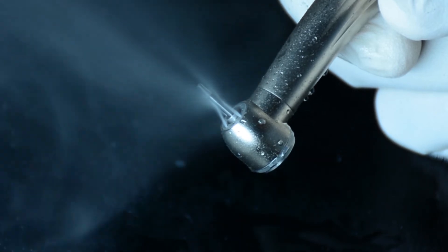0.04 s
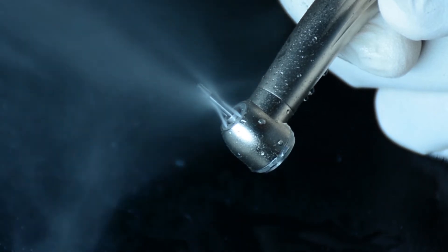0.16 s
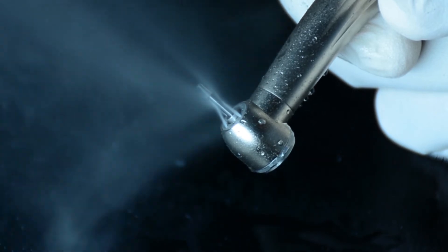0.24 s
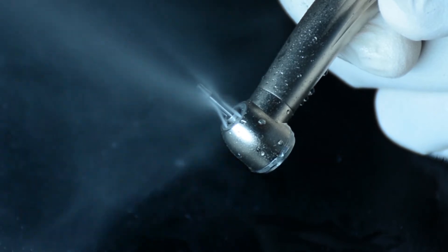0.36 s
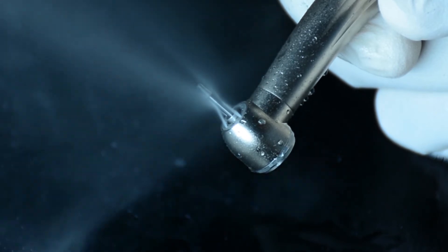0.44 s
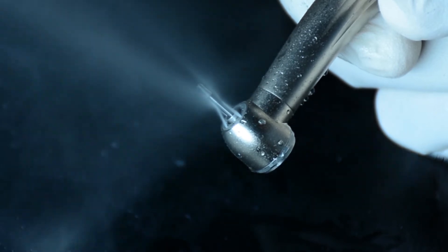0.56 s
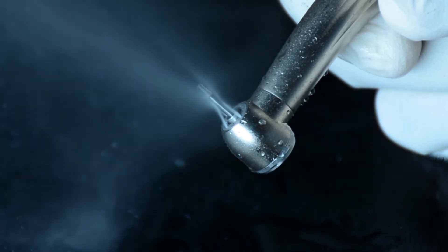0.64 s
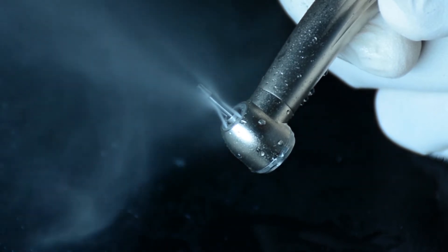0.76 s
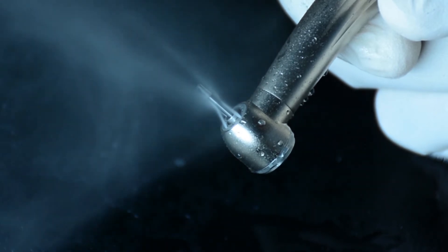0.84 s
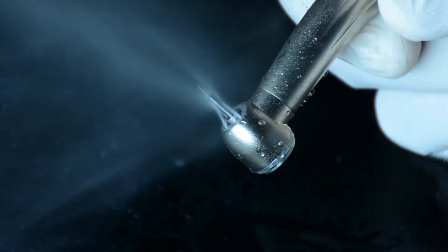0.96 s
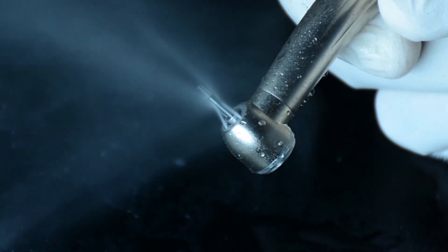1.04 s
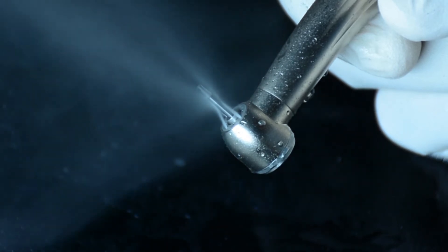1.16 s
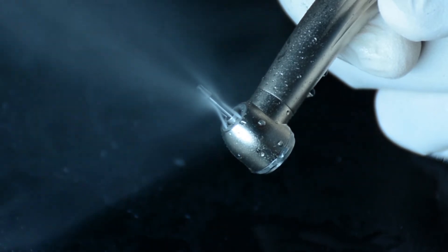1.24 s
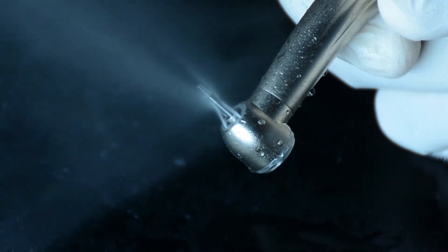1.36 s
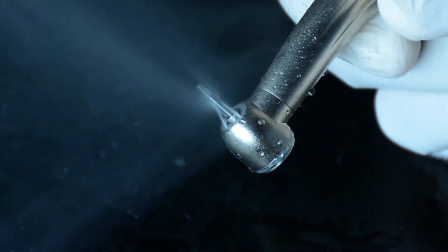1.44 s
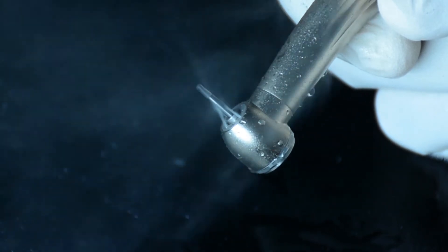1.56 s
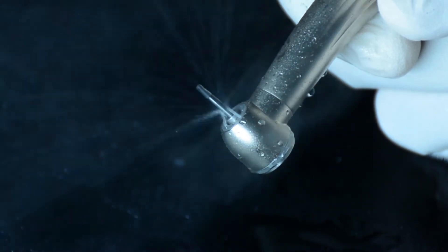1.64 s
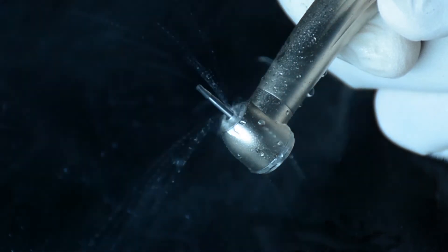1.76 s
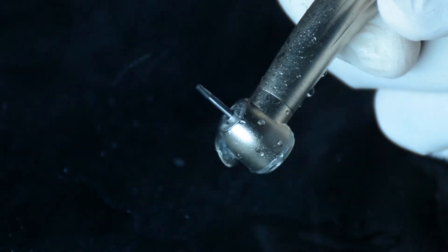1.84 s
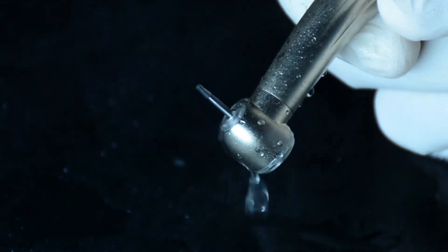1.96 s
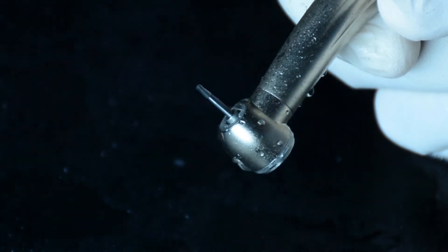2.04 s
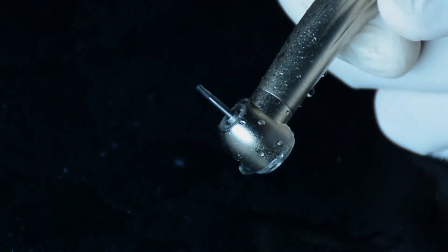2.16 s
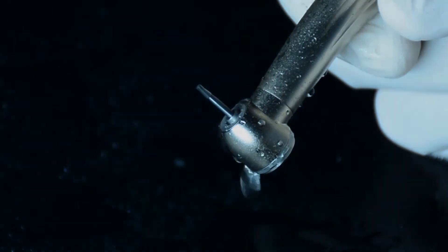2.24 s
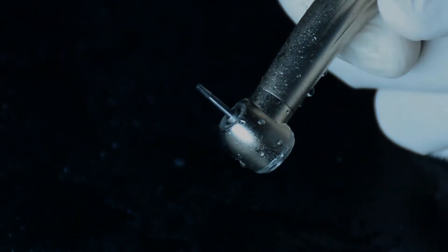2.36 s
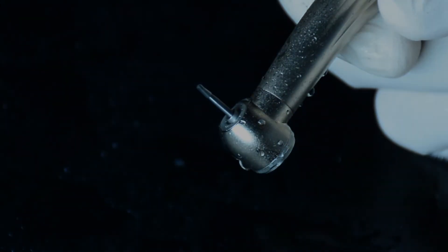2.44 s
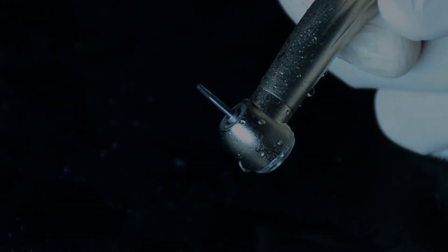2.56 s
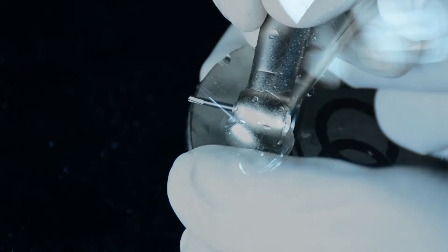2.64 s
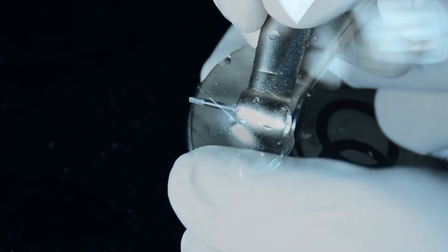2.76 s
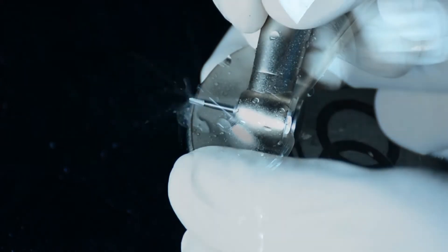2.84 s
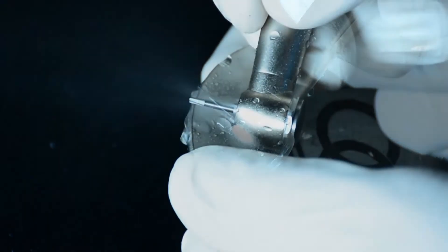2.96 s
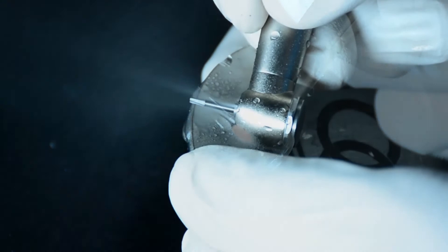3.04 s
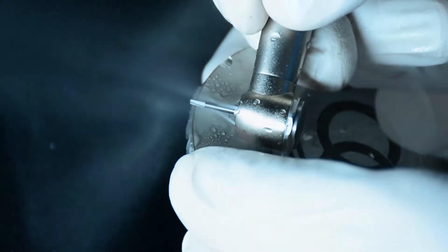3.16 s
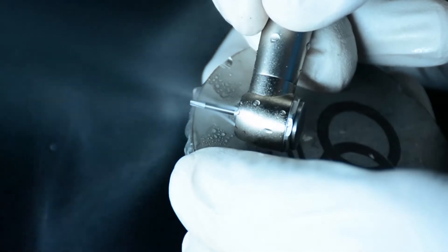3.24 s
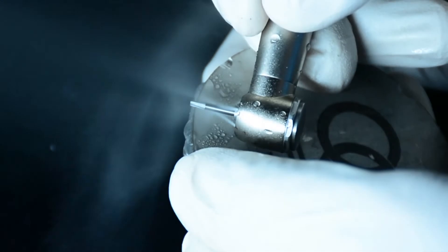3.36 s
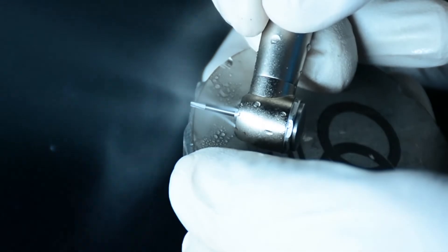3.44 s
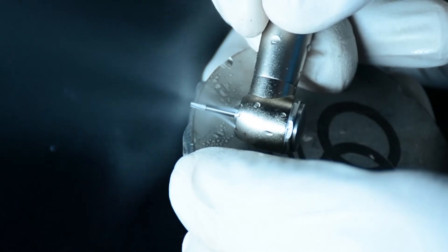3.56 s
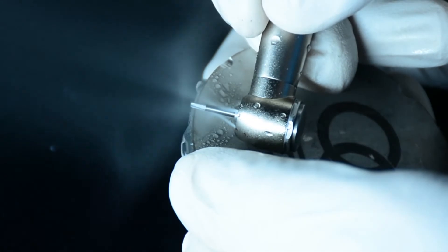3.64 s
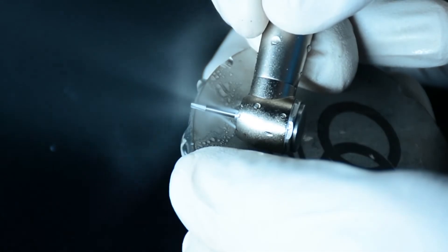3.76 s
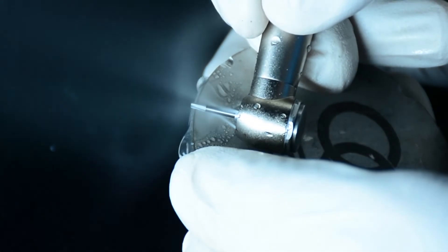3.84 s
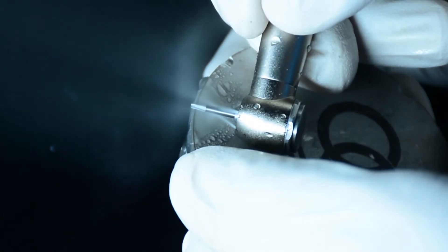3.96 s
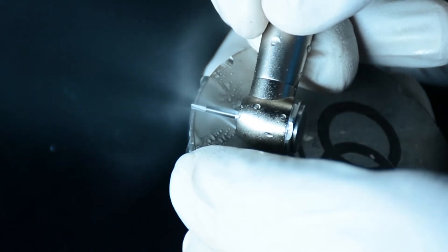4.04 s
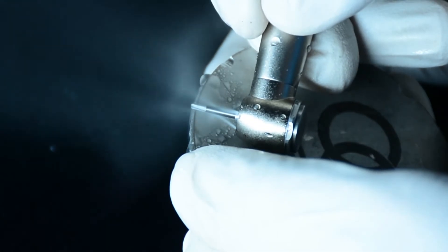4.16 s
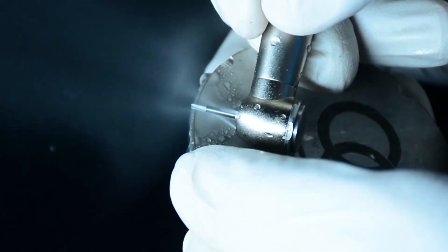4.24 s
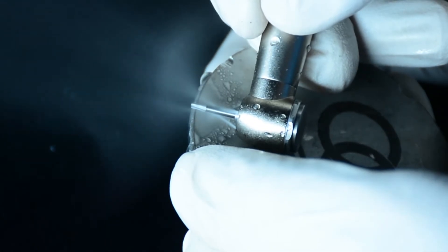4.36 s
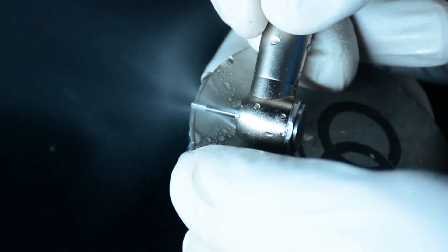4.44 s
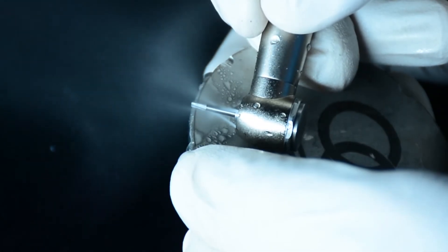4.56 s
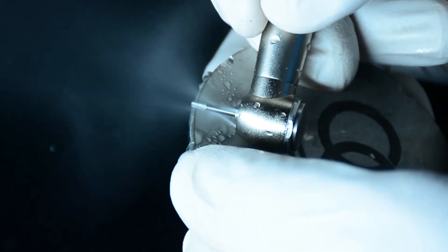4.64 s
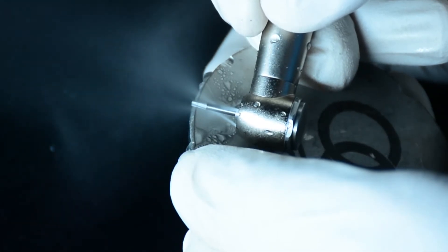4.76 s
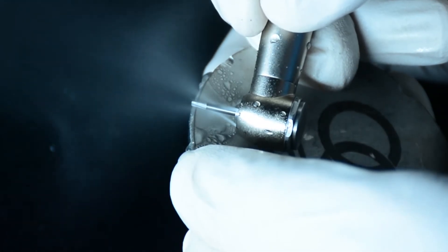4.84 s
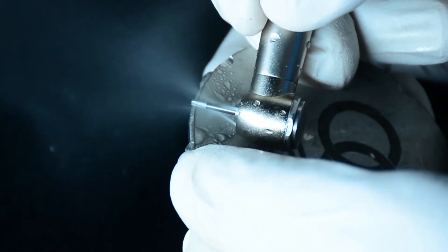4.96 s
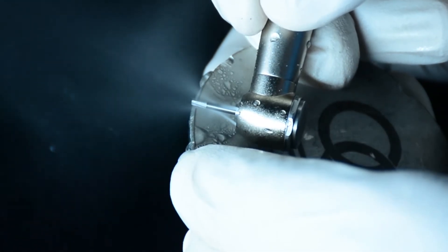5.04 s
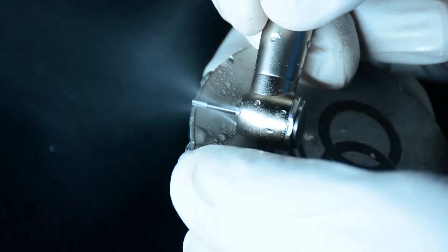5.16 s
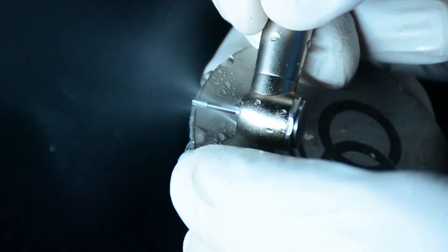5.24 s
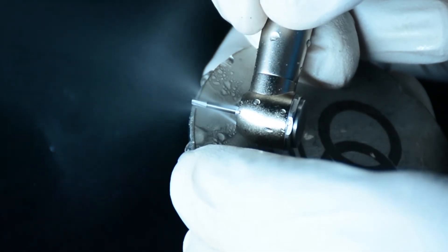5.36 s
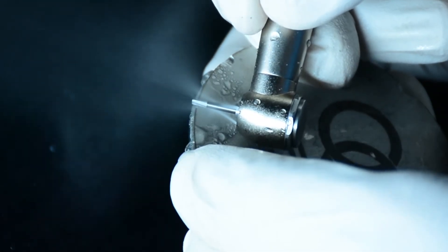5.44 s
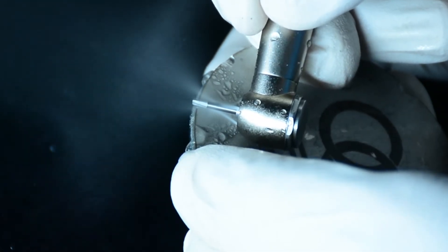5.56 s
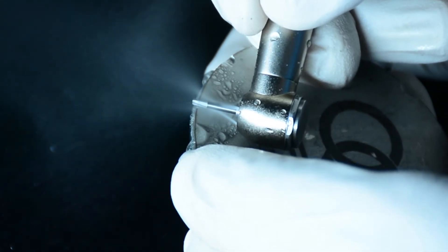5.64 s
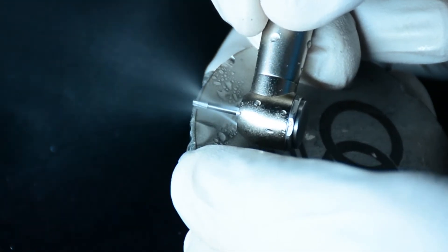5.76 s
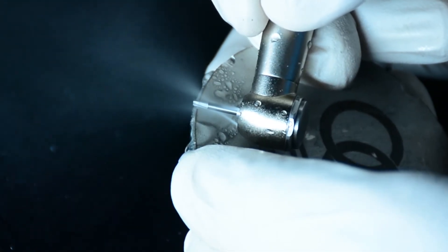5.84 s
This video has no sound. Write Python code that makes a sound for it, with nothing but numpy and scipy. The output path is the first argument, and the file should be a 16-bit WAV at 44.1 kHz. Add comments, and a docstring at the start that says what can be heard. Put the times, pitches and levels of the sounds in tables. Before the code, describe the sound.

Close stereo pickup in a small hard room: a dental drill runs with thin high whine under bright water spray hiss. The air cuts off with small whistles and the rotor glides down in pitch to quiet. After a short lull it shoots up again, spray returns, and the bur grinds a hard piece, ringing and sagging in pitch.

```python
"""A dental air turbine whines at close range under its water spray; the pedal is let go and the rotor coasts down.
After a lull a turbine spins up and its bur bites into a hard piece, which drags the speed down and rings.
Rotor orders are sines on one shaft angle; exhaust, spray, cutting and a low room hum are coloured noise.
Air lines add brief whistles made of tone and breath; a small hard room answers the rotor and whistles."""
import sys
import numpy as np
from scipy import signal
from scipy.fft import rfft, irfft, next_fast_len
from scipy.io import wavfile
from scipy.ndimage import uniform_filter1d, map_coordinates

SR = 44100
rng = np.random.default_rng(int(sys.argv[2]) if len(sys.argv) > 2 else 0)


def generate_wav(sig):
    """Save sig (samples, or channels by samples) to the path in sys.argv[1] as 16-bit PCM at SR."""
    pcm = np.round(np.clip(np.atleast_2d(sig).T, -1, 1) * 32767).astype(np.int16)
    wavfile.write(sys.argv[1], SR, pcm)


N = 259749  # length in samples

# Murmur of machines and ventilation. Each row: time in seconds, level in dB.
HUM = [(0, -65.5), (2.1, -65.5), (2.8, -68), (3.15, -62.5), (4.3, -66.5), (4.4, -72), (5.89, -74)]
# Tone colour of that murmur. Each row: frequency in Hz, relative level per Hz in dB.
HUM_COLOUR = [(15, -78), (25, -26.5), (169, -11.5), (261, -12), (324, -12), (570, -5.5), (652, -4.5),
              (831, -4.5), (901, -9.5), (2080, -9.5), (4930, -72), (5790, -37), (6810, -43), (10500, -20),
              (15700, -41)]
# Flow of air and water. Each row: time in seconds, exhaust level in dB, spray level in dB.
AIR = [(0, -52.5, -37.5), (1.44, -52, -37.5), (1.51, -50.5, -35.5), (1.67, -64, -52), (1.72, -63, -55),
       (1.9, -66.5, -71), (2.05, -68, -66), (2.4, -71, -75), (2.54, -72.5, -72), (2.77, -75, -75),
       (2.8, -62, -56.5), (2.85, -53, -48), (2.93, -53, -40.5), (3.2, -49.5, -36), (3.6, -48.5, -35),
       (4.21, -48, -35), (4.7, -52, -38), (5.05, -52, -37.5), (5.53, -51.5, -36.5), (5.73, -58.5, -41.5),
       (5.89, -55, -38)]
# Colour of the exhaust rush. Each row: frequency in Hz, relative level per Hz in dB.
EXHAUST_COLOUR = [(180, -37), (300, -26.5), (595, -13), (653, -16), (775, -6.5), (1780, -3), (2050, 2),
                  (2350, -3.5), (2710, -5), (3440, -4.5), (4840, -7.5), (5520, -12), (5980, -15),
                  (7000, -9.5), (9100, -53), (15400, -120)]
# Colour of the spray hiss. Each row: frequency in Hz, relative level per Hz in dB.
SPRAY_COLOUR = [(1500, -57), (2500, -20), (3400, -12.5), (5000, -11.5), (7000, -8.5), (10000, -5),
                (13900, -2), (15800, -2.5)]
# Colour of the air leaking from the nozzle. Each row: frequency in Hz, relative level per Hz in dB.
NOZZLE_COLOUR = [(6000, -14), (9000, -13), (11700, 2), (13000, -7), (15800, -34)]
# Short whistles in the air lines. Each row: peak time in seconds, pitch in Hz, width in Hz,
# peak level in dB, time to fall 60 dB in seconds.
WHISTLES = [(.045, 1636, 49.4, -56, 0.14), (.43, 1624, 58.3, -56, .2), (1.49, 3085, 49.7, -53, 0.23),
            (1.53, 500, 78.9, -58, 0.15), (1.57, 1620, 59.6, -56, 0.083), (1.74, 1040, 149, -65, 1),
            (1.93, 646, 200, -66, 1), (2.48, 1910, 400, -64.5, 0.18), (2.559, 1590, 43.6, -56.5, 0.1),
            (2.64, 1600, 87, -71.5, 1.4), (2.851, 2000, 150, -59, 0.27), (2.84, 1310, 253, -56, 0.19)]
# Bur on the work piece. Each row: time in seconds, level in dB.
CUT = [(4.12, -86), (4.18, -40), (4.24, -36.5), (4.4, -41), (4.7, -42), (4.9, -46), (5.45, -42.5),
       (5.6, -54), (5.89, -42)]
# Resonances of the piece. Each row: centre in Hz, width in Hz, level in dB before sharpening.
PIECE = [(3450, 300, 1.5), (5160, 750, -9.5), (7900, 740, 1), (11000, 350, -6.5), (13100, 1300, -3),
         (13440, 590, 3.5)]
# Shaft speed. Each row: time in seconds, turns per second in Hz.
SPEED = [(0, 5830), (1.33, 5814), (1.46, 5740), (1.53, 5490), (1.62, 4700), (1.83, 3085), (2.05, 1670),
         (2.17, 1200), (2.35, 733), (2.55, 420), (2.82, 130), (2.9, 860), (2.98, 2430), (3.05, 3520),
         (3.14, 4590), (3.23, 5190), (3.36, 5730), (3.5, 6070), (3.65, 6150), (3.97, 6195), (4.18, 6183),
         (4.28, 5990), (4.5, 5375), (4.7, 4750), (4.9, 4455), (5.05, 4460), (5.3, 4400), (5.42, 4480),
         (5.51, 4460), (5.59, 4240), (5.7, 3810), (5.83, 3400), (5.89, 3310)]
# Whine before the head colours it. Each row: time in seconds, then levels of the
# 1st, 2nd and 3rd shaft order in dB.
WHINE = [(0, -67.5, -61, -90), (.3, -57.5, -70, -90), (.85, -54.5, -64, -90), (1.22, -70.5, -82, -94),
         (1.41, -54.5, -64, -72), (1.54, -57, -66, -70), (1.64, -60, -72, -76), (1.72, -50.5, -72, -69),
         (2.0, -52.5, -78, -81), (2.1, -66, -58.5, -95), (2.2, -100, -100, -100), (2.97, -100, -100, -100),
         (2.995, -45, -72, -100), (3.15, -49, -68, -100), (3.35, -54.5, -53, -100), (3.7, -51.5, -51, -100),
         (4.05, -50.5, -49.5, -100), (4.3, -56, -57, -90), (4.45, -63, -55, -70), (4.52, -45, -57, -48),
         (4.88, -44, -49.5, -50), (5.0, -53.5, -56, -48), (5.12, -46, -49.5, -44), (5.46, -46, -51.5, -47),
         (5.56, -44, -38, -33.5), (5.66, -50.5, -35.5, -48), (5.74, -51, -48.5, -46),
         (5.81, -44, -39.5, -49), (5.89, -45, -59, -45)]
# Buzz of blades (multiples of 8) and ball bearings (uneven multiples).
# Each row: multiple of the shaft rate, level in dB relative to the coasting swell.
BUZZ_ORDERS = [(4.87, -12), (5.82, 1), (8, -1), (9.66, 0), (12.7, -4), (14.6, 0), (16, -2), (18.4, 1),
               (19.6, 1), (23, 1), (28, -3)]
# Resonances of the head. Each row: centre in Hz, width in Hz, level in dB before sharpening.
HEAD = [(3200, 350, 2), (3850, 250, 2), (4400, 350, 0), (5850, 600, 3), (7500, 450, 0), (9000, 500, 1),
        (10500, 700, 1), (12000, 900, 2), (14000, 1500, 1)]
# Side level by frequency, one curve for air and cutting, one for hum and leak.
# Each row: frequency in Hz, side relative to mid in dB.
AIR_CUT_SIDE = [(30, -33), (500, -22), (1200, -23.5), (3000, -52), (6500, -29.5), (9000, -12.5),
                (12000, -7.5), (15000, -4.5)]
HUM_LEAK_SIDE = [(30, -24), (300, -25), (2000, -11.5), (5500, 12), (15000, -13)]
# Decay of the walls. Each row: frequency in Hz, time to fall 60 dB in seconds.
WALLS = [(300, .4), (3000, .35), (6000, .32), (12000, .16)]
# Stereo lean of the two ports. Each row: frequency in Hz, left minus right in dB.
LEAN = [(60, 3), (240, 3.5), (700, 0.5), (3770, -0.7), (15000, 0.1)]
# Swells of the coasting buzz, a brief rising siren tone as the jet spins up the rotor, and the last nozzle air.
# Each holds: start, attack, hold and release in seconds, level in dB.
COAST = (1.75, .25, .5, .35, -83)
RISING_TONE = (2.89, .025, .045, .012, -47)
LEAK = (1.55, 0.95, .17, .1, -70.5)

FADE_DB = 40  # span of a swell's attack and release
FOURTH_DB = -44  # 4th shaft order before the head, only while the bur bites
CLOSE_S, BUFFET_S = 1.54, .09  # when the valve closes; how long it buffets the blades
PUFF_RISE_S = 0.05  # a whistle is 20 dB under its peak this long before it
HUM_LEAN_DB = -3.5  # left minus right, ahead of the lean of the ports
TOP_HZ = 15780  # band limit


def amp(db):
    """Gain of a level in dB."""
    return 10 ** (np.asarray(db) / 20)


def unit(x):
    """Scale x to rms 1."""
    return x / np.sqrt(np.mean(x ** 2) + 1e-20)


def along(points, hz):
    """Read a curve of (Hz, value) points on a log frequency axis."""
    f, v = np.transpose(points)
    return np.interp(np.log(hz + 1), np.log(f + 1), v)


def curves(rows):
    """One value per sample for each column after the time."""
    s, *cols = np.transpose(rows)
    return [np.interp(np.arange(N) / SR, s, c) for c in cols]


def swell(start, attack, hold, release, db):
    """Level in dB of an attack, hold and release; silent outside."""
    corners = start + np.cumsum([0, attack, hold, release])
    return np.interp(np.arange(N) / SR, corners, [db - FADE_DB, db, db, db - FADE_DB], -200, -200)


def wobble(rate):
    """A smooth random curve with rate knots a second."""
    knots = rng.standard_normal(int(N * rate / SR) + 4)
    return map_coordinates(knots, [np.arange(N) * rate / SR])


def filtered(x, response):
    """Shape the spectrum of x by a response of frequency."""
    m = next_fast_len(N + SR // 2)
    return irfft(rfft(x, m) * response(np.fft.rfftfreq(m, 1 / SR)), m)[..., :N]


def peak(hz, centre_hz, width_hz):
    """Magnitude of one resonance, 1 at its centre."""
    return hz * width_hz / np.hypot(centre_hz ** 2 - hz ** 2, hz * width_hz)


def modes(table, hz):
    """Joint magnitude of several resonances, their powers added."""
    return np.sqrt(sum((amp(db) * peak(hz, c, w)) ** 2 for c, w, db in table))


def rush(gain, side_db, patchy_db):
    """Stereo noise of rms 1, turbulent in time-frequency patches of random gain."""
    z = signal.stft(rng.standard_normal((2, N)), nperseg=512)[2]
    field = uniform_filter1d(rng.standard_normal(z.shape[1:]), size=5, axis=0)
    field = uniform_filter1d(field, size=12, axis=1)
    pair = signal.istft(z * amp(patchy_db * unit(field)), nperseg=512)[1][:, :N]
    mid, side = filtered(pair, lambda hz: gain(hz) * [np.ones_like(hz), amp(along(side_db, hz))])
    return unit(np.array([mid + side, mid - side]))


def hum():
    """Machines and ventilation blend into a low noise murmur."""
    murmur = rush(lambda hz: amp(along(HUM_COLOUR, hz)), HUM_LEAK_SIDE, patchy_db=1.34)
    return amp(curves(HUM)[0] + HUM_LEAN_DB * np.array([[.5], [-.5]])) * murmur


def room(x):
    """Walls scatter the sound into a noise tail in which each frequency dies at its own speed."""
    hz, t, z = signal.stft(rng.standard_normal((2, SR // 2)), SR, nperseg=256)
    decay_db = -60 * t / along(WALLS, hz)[:, None]
    tail = signal.istft(z * amp(decay_db), SR, nperseg=256)[1]
    delayed = np.pad(x, (130, 0))[None]  # samples before the answer starts
    return signal.fftconvolve(delayed, tail / np.linalg.norm(tail[0]), axes=1)[:, :N]


def air():
    """Drive air leaves the head as a dull rush; the spray jets hiss and sputter above it."""
    exhaust_db, spray_db = curves(AIR)
    sputter_db = 0.68 * wobble(8) + 0.15 * wobble(45)
    exhaust = rush(lambda hz: amp(along(EXHAUST_COLOUR, hz)), AIR_CUT_SIDE, patchy_db=1.0)
    spray = rush(lambda hz: amp(along(SPRAY_COLOUR, hz)), AIR_CUT_SIDE, patchy_db=0.6)
    leak = rush(lambda hz: amp(along(NOZZLE_COLOUR, hz)), HUM_LEAK_SIDE, patchy_db=1.8)
    body = amp(exhaust_db + 0.42 * wobble(8.5)) * exhaust
    hiss = amp(spray_db + sputter_db) * spray
    return body + hiss + amp(swell(*LEAK)) * leak


def whistles():
    """Each puff of air sounds one wavering pitch, swells and dies; the wider, the breathier."""
    t, out = np.arange(N) / SR, np.zeros(N)
    for s, centre_hz, width_hz, db, t60 in WHISTLES:
        pitch = centre_hz + .6 * width_hz * wobble(40)
        tone = np.sqrt(2) * np.sin(2 * np.pi * np.cumsum(pitch) / SR)
        breath = unit(filtered(rng.standard_normal(N), lambda hz: peak(hz, centre_hz, width_hz) ** 2))
        share = np.clip(width_hz / 70, 0, 1)  # all breath from 70 Hz width up
        puff = np.sqrt(1 - share) * tone + np.sqrt(share) * breath
        shape_db = np.where(t < s, -20 * ((s - t) / PUFF_RISE_S) ** 2, -60 * (t - s) / t60)
        out += puff * amp(np.maximum(db + shape_db, -200))
    return out


def cutting():
    """Grit scratches the piece and drives its sharp resonances."""
    scratch = rush(lambda hz: modes(PIECE, hz) ** 1.35, AIR_CUT_SIDE, patchy_db=1.1)  # power sharpens them
    return amp(curves(CUT)[0] + .5 * wobble(30)) * scratch


def rotor():
    """Shaft, blade and bearing orders as sines on one shaft angle; each flickers on its own."""
    speed = uniform_filter1d(curves(SPEED)[0], size=2000)  # inertia rounds every change
    load = np.clip((curves(CUT)[0] + 90) / 40, 0, 1)  # the biting bur shakes the shaft
    # the closing valve buffets the blades
    buffet = np.exp(-((np.arange(N) / SR - CLOSE_S) / BUFFET_S) ** 2)
    levels_db = curves(WHINE) + [np.where(load > .5, FOURTH_DB, -200)]
    shake = (.08 + .36 * load + 1.3 * buffet) * wobble(150)  # radians
    angle = 2 * np.pi * np.cumsum(speed) / SR + shake

    def order(k, db, flicker_db):
        """One sine at k times the shaft rate, muted well above the band limit."""
        sine = np.sqrt(2) * np.sin(k * angle + rng.uniform(0, 2 * np.pi))
        tone = sine * (k * speed < TOP_HZ + 500)
        return tone * amp(db + flicker_db * (0.19 * wobble(8.5) + wobble(70)))

    whine_flicker_db = 1.4 + 1.1 * load + 1.5 * buffet
    whine = sum(order(k + 1, db, whine_flicker_db) for k, db in enumerate(levels_db))
    buzz = sum(order(k, swell(*COAST) + db + 2.5 * wobble(12), 2.5) for k, db in BUZZ_ORDERS)
    # an order swells whenever it glides through a resonance of the head
    voiced = filtered(whine, lambda hz: amp(-9) + .7 * modes(HEAD, hz) ** 1.4)
    voiced += filtered(buzz, lambda hz: modes(HEAD, hz) ** 2.4 * (hz > 3900))
    rising_tone = order(8.8, swell(*RISING_TONE), 1.1)  # bypasses the head resonances
    return voiced + rising_tone


def scene():
    """All sources; the tones carry their room answer, mostly alike at both ports."""
    tones = rotor() + whistles()
    common, apart = room(tones)
    answer = common + 0.32 * apart * [[1], [-1]]
    return tones + amp(-6) * answer + air() + cutting() + hum()


def record(dry):
    """The two ports differ slightly in level by frequency; nothing is kept above the band limit."""
    return filtered(dry, lambda hz: amp(along(LEAN, hz) * [[.5], [-.5]]) * (hz < TOP_HZ))


dry = scene()
out = record(dry)
generate_wav(out)
```